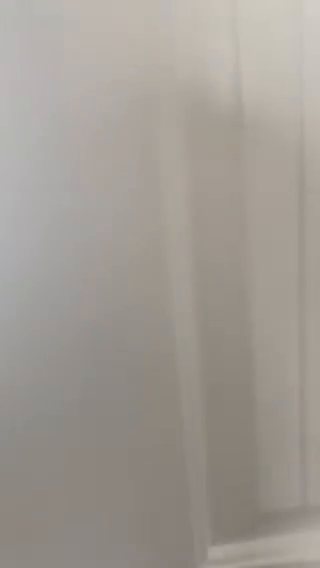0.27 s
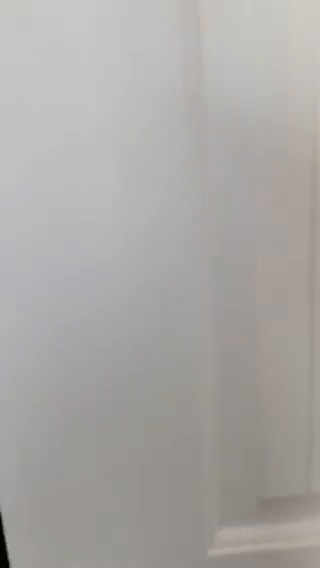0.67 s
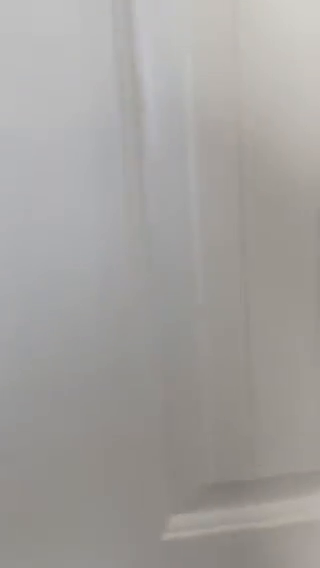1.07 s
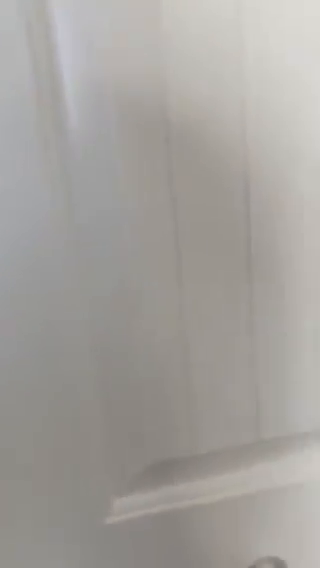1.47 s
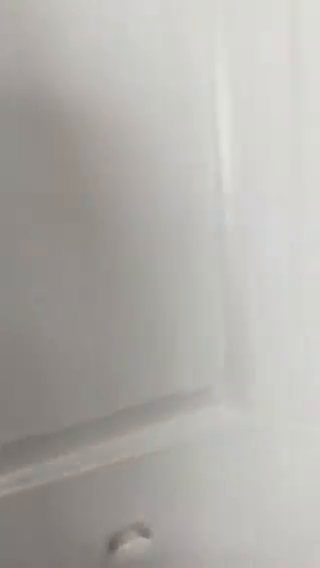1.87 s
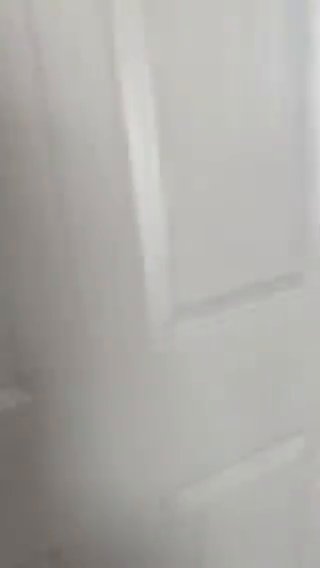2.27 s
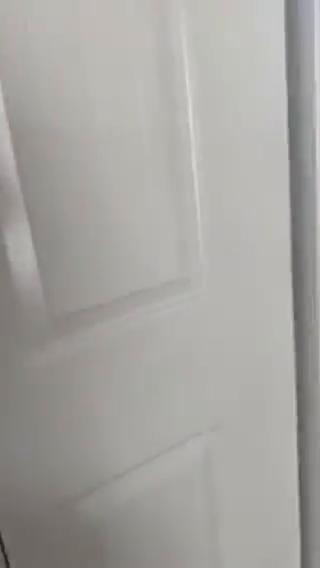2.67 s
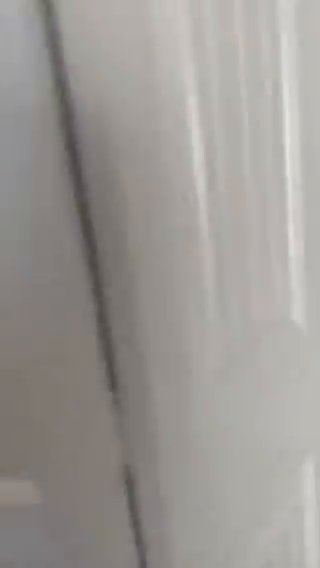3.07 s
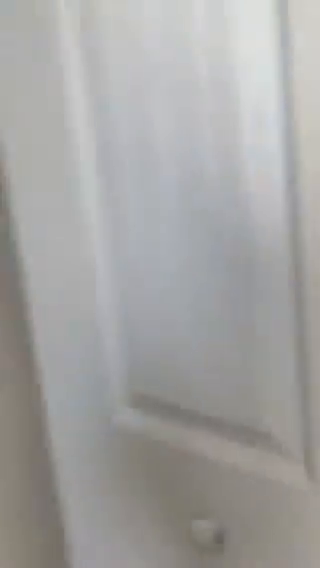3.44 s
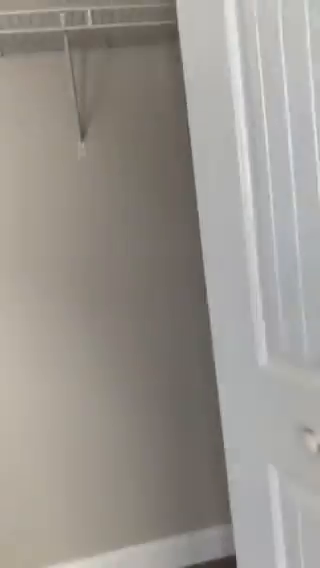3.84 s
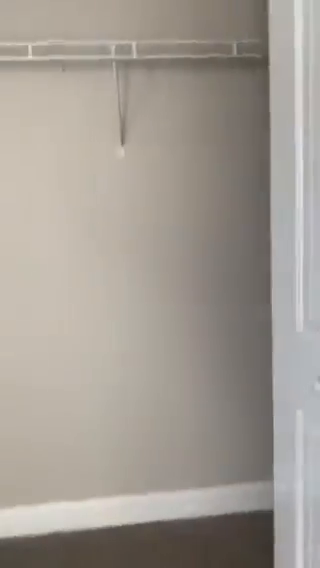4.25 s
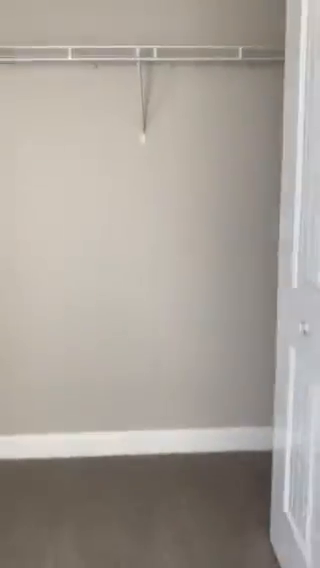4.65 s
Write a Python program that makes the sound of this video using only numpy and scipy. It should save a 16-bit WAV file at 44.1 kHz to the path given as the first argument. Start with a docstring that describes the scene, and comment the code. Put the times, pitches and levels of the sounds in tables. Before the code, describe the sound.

A hollow folding closet door pops free with a sharp knock, then booms, scuffs, creaks and scrapes along its track before clattering folded in a bare room.

```python
"""Faint scuffing and a light tick come first; then a hollow folding closet door breaks free with a sharp knock.
Its panels boom, its hinges tick and scuff, and its guide pin scrapes and catches along the track,
before the leaves fold together with a clatter in a bare room, close to a hand-held phone.
Blows and shoves excite decaying modes; friction is made of random slips, filtered by what they shake.
Each source sends sound straight to two microphone ports and into a diffuse room."""
import sys
import numpy as np
from scipy import signal
from scipy.fft import rfft, irfft, next_fast_len
from scipy.io import wavfile
from scipy.ndimage import uniform_filter1d

SR = 44100
rng = np.random.default_rng(int(sys.argv[2]) if len(sys.argv) > 2 else 0)


def dump_mix(stems):
    """Bounce the given channels to the path in sys.argv[1] as a 16-bit WAV at rate SR."""
    frames = np.atleast_2d(stems).T  # one column per channel
    limited = np.clip(frames, -1, 1)  # hard clip at full scale
    pcm = np.round(limited * 32767).astype(np.int16)
    wavfile.write(sys.argv[1], SR, pcm)


N = 212253
T = np.arange(N) / SR
SIZE = next_fast_len(N + SR)  # padded so that a one-second response cannot wrap around
FREQ = np.arange(SIZE // 2 + 1) * SR / SIZE + 1e-6  # bins [Hz], offset to keep logarithms finite


def undb(db):
    """Level law: decibels to amplitude gain."""
    return 10 ** (np.asarray(db) / 20)


def unit(x):
    """Normalisation: scale to rms 1."""
    return x / np.sqrt(np.mean(x ** 2))


def at(points, hz):
    """Logarithmic pitch axis: interpolate (frequency, value) points along it."""
    f, value = np.transpose(points)
    return np.interp(np.log(hz), np.log(f), value)


def shape(x, response):
    """Linear filtering: multiply the spectrum by a frequency response."""
    return irfft(rfft(x, SIZE) * response, SIZE)[..., :N]


def edge(x, hz, kind, order=2):
    """Causal filtering: a Butterworth low-, high- or band-pass."""
    safe_hz = np.minimum(hz, SR * .48)
    return signal.sosfilt(signal.butter(order, safe_hz, kind, fs=SR, output="sos"), x)


def add(track, s, sound):
    """Superposition: mix a sound in from time s."""
    i = max(int(s * SR), 0)
    track[..., i:i + sound.shape[-1]] += sound[..., :N - i]


def with_send(sound, room_db):
    """Direct and reverberant fields: one row for the phone, one row sent into the room."""
    return np.array([sound, sound * undb(room_db)])


def ring(modes):
    """Modal synthesis: exponentially decaying sines, each up to one second long."""
    out = np.zeros(SR)
    for hz, db, t60 in modes:
        t = T[:min(int(2 * t60 * SR), SR)]
        decay = np.exp(-np.log(1000) * t / t60)
        out[:len(t)] += undb(db) * np.sin(2 * np.pi * hz * t) * decay
    return out


def slips(rate, scatter_db):
    """Stick-slip friction: tiny slips at random moments, rate per second, of very unequal size."""
    moments = rng.random(N) < rate / SR
    return moments * rng.standard_normal(N) * undb(scatter_db * rng.standard_normal(N))


def walk(rate):
    """Slow random modulation: values held for 1 / rate s, slewed, and scaled to rms 1."""
    hold = int(SR / rate)
    steps = np.repeat(rng.standard_normal(N // hold + 1), hold)[:N]
    return unit(uniform_filter1d(steps, hold))


# Background noise spectrum as (frequency [Hz], relative level [dB]).
HOUSE_SPECTRUM = [(20, -6), (50, 1), (110, -2), (300, -9), (600, -29), (1200, -36.5), (2500, -34),
                  (6500, -40.5), (10000, -42.5), (16000, -50.5)]


def house_noise():
    """Stationary filtered noise: the faint steady sound of the house."""
    return undb(-55.5) * unit(shape(rng.standard_normal(N), undb(at(HOUSE_SPECTRUM, FREQ))))


# Reverberation time of the room as (frequency [Hz], t60 [s]).
ROOM_DECAY = [(100, 0.69), (400, 0.59), (1200, 0.68), (3500, 0.53), (7000, 0.45), (14000, 0.1)]
# Spectrum of the reverberant sound as (frequency [Hz], gain [dB]).
ROOM_SPECTRUM = [(30, -18.5), (100, 0.5), (200, -3.5), (400, 1.5), (800, 0), (1500, -1.5), (3000, -5),
                 (7000, -9), (10000, -9), (16000, 1)]


def room(x, build_s=0.0025):
    """Diffuse reverberation: echoes build up within a few ms, then decay at a rate set by frequency."""
    t, tail = T[:SR], 0
    edges = np.geomspace(40, 18000, 12)
    spectrum, hz = rfft(rng.standard_normal(SR)), np.arange(SR // 2 + 1)
    build_up = 1 - np.exp(-(t / build_s) ** 2)
    for lo, hi in zip(edges, edges[1:]):
        band = irfft(spectrum * (hz >= lo) * (hz < hi), SR)
        fade = np.exp(-np.log(1000) * t / at(ROOM_DECAY, np.sqrt(lo * hi))) * build_up
        tail = tail + band * fade / np.sqrt(np.sum(fade ** 2))
    return shape(x, rfft(tail, SIZE) * undb(at(ROOM_SPECTRUM, FREQ)))


# Likeness of the two microphone ports as
# (frequency [Hz], lead of the left port [rad], coherence of the room sound [0-1]).
PORT_LIKENESS = [(0, 0, 1), (350, -0.3, 0.86), (700, -0.65, 0.2), (1400, 0.1, 0.35), (2700, 1.7, 0.44),
                 (3800, 1.5, 0.69), (4900, 3.2, 0.9), (6400, 5.8, 0.85), (7500, 6.5, 0.9), (8350, 9.1, 0.7),
                 (9600, 9.6, 0.7), (10500, 12.6, 0.85), (11600, 12.5, 0.62), (12600, 15.7, 0.6),
                 (13600, 15.7, 0.8), (14500, 18.7, 0.8)]


def ports(near, echo, other_echo):
    """Interaural-style coherence: near sound differs only in phase, while echoes are partly unrelated."""
    hz, lead, coherence = np.transpose(PORT_LIKENESS)
    turn = np.exp(.5j * np.interp(FREQ, hz, lead))  # each port takes half the lead
    alike = np.sqrt(np.interp(FREQ, hz, coherence))
    mid = near + shape(echo, np.sqrt((1 + alike) / 2))
    side = shape(other_echo, np.sqrt((1 - alike) / 2))
    return np.array([shape(mid + side, turn), shape(mid - side, 1 / turn)])


BUILD_DB = 8  # a push starts this far down and gains it as the door gathers speed
RELEASE_S = 0.019  # linear set-in time, and time constant of the ending


def effort(start_s, rise_s, stop_s, sag_db_per_s):
    """Friction follows motion: the gain of a push as the door gathers speed, slows steadily and stops."""
    age = T - start_s
    build_db = -BUILD_DB * np.clip(1 - age / rise_s, 0, 1) ** 2
    sag_db = -sag_db_per_s * np.maximum(age - rise_s, 0)
    stopping = np.exp(-np.maximum(T - stop_s, 0) / RELEASE_S)
    return undb(build_db + sag_db) * np.clip(age / RELEASE_S, 0, 1) * stopping


def shifting(x, colour, depth_db, rate):
    """Moving contact point: each narrow band of the coloured sound swells and fades on its own."""
    spectrum, out = rfft(x, SIZE) * undb(at(colour, FREQ)), 0
    edges = np.geomspace(20, 20000, 26)
    for lo, hi in zip(edges, edges[1:]):
        band = irfft(spectrum * (FREQ >= lo) * (FREQ < hi), SIZE)[:N]
        out = out + band * undb(depth_db * walk(rate))
    return unit(out)


# Response of the shaken hollow leaf as (frequency [Hz], relative level [dB]).
LEAF_RUMBLE = [(25, -5.5), (50, 5.5), (75, -19.5), (102, 10), (135, -1.5), (180, -0.5), (235, -4.5),
               (290, -7.5), (400, -5.5), (500, -14), (680, -34), (1500, -76.5)]
SCRAPE_LATE_S = 0.19  # added to the rise: the edge bears down fully only once the leaf is under way


def rubbing(push, colour, jiggle_db=-12):
    """Friction excitation: slips shake the leaf and scrape its edge in spurts; loose pivots tap the skin."""
    start_s, rise_s, stop_s, sag, rumble_db, scrape_db = push
    shake = undb(rumble_db + 1.9 * walk(rate=16)) * effort(start_s, rise_s, stop_s, sag)
    scrape = undb(scrape_db) * effort(start_s, rise_s + SCRAPE_LATE_S, stop_s, sag)
    body = unit(shape(slips(rate=900, scatter_db=3.0), undb(at(LEAF_RUMBLE, FREQ))))
    taps = unit(shape(slips(rate=130, scatter_db=1), rfft(ring(SKIN_MODES), SIZE)))
    spurts = slips(rate=1500, scatter_db=1.8) * undb(3.2 * walk(rate=28))
    grit = shifting(spurts, colour, depth_db=3.5, rate=14)
    rumble = with_send(shake * body, room_db=-3.5)
    tapping = with_send(undb(jiggle_db) * shake * taps, room_db=1.5)
    return rumble + tapping + with_send(scrape * grit, room_db=3)


# The hand takes hold, swings the leaves out, slides them aside, then presses them together, as
# (start [s], rise [s], stop [s], sag [dB/s], rumble level [dB], scrape level [dB]).
HAND_PUSHES = [(0.0, 0.0067, 0.14, 9, -63, -59), (0.84, 0.24, 3.3, 12.5, -44.5, -58.5),
               (2.957, 0.53, 4.42, 8, -45, -53), (4.487, 0.2, 4.7, 19, -43.5, -70)]
# Edge friction spectra, scuffing and scraping, as (frequency [Hz], relative level [dB]).
SCUFF_SPECTRUM = [(200, -24), (450, 3), (800, -7), (1200, -7), (1800, -9), (2600, -21), (4000, -19),
                  (5000, -14.5), (6500, -22), (9000, -38), (15000, -38.5)]
SCRAPE_SPECTRUM = [(200, 1), (400, 2.5), (620, 1), (900, 0.5), (1080, 4), (1400, -4), (2000, -6),
                   (2800, -6.5), (4500, -8.5), (6800, -15.5), (9000, -35), (15000, -36)]


def friction():
    """Sliding friction: sum the four pushes; only the slide aside has the scraping spectrum."""
    colours = (SCUFF_SPECTRUM, SCUFF_SPECTRUM, SCRAPE_SPECTRUM, SCUFF_SPECTRUM)
    return sum(rubbing(push, colour) for push, colour in zip(HAND_PUSHES, colours))


# Resonances of the metal track as (frequency [Hz], width [Hz], level [dB]).
TRACK_RESONANCES = [(1126, 54, 7), (1880, 150, 6), (2290, 200, 6), (2980, 510, -3), (3820, 720, 6)]
# The pin bears on the track once the leaves have begun to fold, as
# (start [s], rise [s], stop [s], sag [dB/s]).
PIN_TRAVEL = (3.41, 0.39, 4.31, 7.8)


def guide_pin(run_db=-57, soft_hz=7500):
    """Source-filter principle: the plastic pin's uneven judder excites the resonances of the metal track."""
    track = 0
    for hz, width, db in TRACK_RESONANCES:
        track = track + undb(db) / (1 + 1j * (FREQ / hz - hz / FREQ) * hz / width)
    track = track / np.sqrt(np.mean(abs(track) ** 2))
    force = undb(run_db) * effort(*PIN_TRAVEL)
    spurts = unit(slips(rate=1400, scatter_db=2) * undb(3.5 * walk(rate=30)))
    grain = edge(spurts, soft_hz, "low")
    return with_send(shape(force * grain, track), room_db=1.0)


# The leaf edge drags and groans, as (time [s], level [dB], resonance [Hz], length [s]).
EDGE_DRAGS = [(0.941, -50, 408, 0.035), (1.066, -48, 458, 0.078), (1.281, -48, 473, 0.047),
              (3.237, -47.5, 423, 0.13), (3.321, -47, 436, 0.061), (3.396, -47, 423, 0.049),
              (3.463, -44.5, 406, 0.076), (3.563, -51, 364, 0.1), (3.602, -50, 830, 0.055),
              (3.741, -50, 720, 0.053)]


def groans(spread=0.074, upper_ratio=2.745, upper_db=-11):
    """Friction-driven resonance: a run of slips rings one narrow leaf resonance and a weaker one above."""
    out = np.zeros((2, N))
    for s, db, hz, length_s in EDGE_DRAGS:
        t = T[:int(length_s * SR)]
        force = slips(rate=1200, scatter_db=1)[:len(t)]
        band = hz * np.array([1 - spread, 1 + spread])
        upper = undb(upper_db) * unit(edge(force, band * upper_ratio, "band"))
        tone = unit(edge(force, band, "band")) + upper
        swell = np.sqrt(np.sin(np.pi * t / length_s))
        add(out, s, with_send(undb(db) * tone * swell, room_db=-4.0))
    return out


# The guide pin catches and slips, as (time [s], level [dB], local ring of the track [Hz]).
PIN_CATCHES = [(3.605, -46, 3600), (3.741, -40, 3440), (3.885, -42, 3800), (4.071, -42, 3770),
               (4.291, -54.5, 3600)]


def catches(spread=0.1, broad_db=-5, low_hz=900, high_hz=5500, decay_s=0.0098):
    """Impulsive release: a broad crunch and a brief ring whose pitch depends on the place along the track."""
    out, t = np.zeros((2, N)), T[:SR // 8]
    for s, db, hz in PIN_CATCHES:
        force = slips(rate=2200, scatter_db=2.5)[:len(t)]
        chink = unit(edge(force, hz * np.array([1 - spread, 1 + spread]), "band"))
        crunch = undb(broad_db) * unit(edge(force, [low_hz, high_hz], "band"))
        add(out, s, with_send(undb(db) * (chink + crunch) * np.exp(-t / decay_s), room_db=-1))
    return out


# Loose pivots rattle on after a heavy blow, as (time [s], level [dB], decay time constant [s]).
PIVOT_RATTLES = [(0.45, -42, 0.086), (2.48, -48, 0.044)]


def rattles(low_hz=2200, high_hz=6500):
    """Repeated micro-impacts: loose pivots buzz in their sockets as a crackle that dies away."""
    out, t = np.zeros((2, N)), T[:SR // 2]
    for s, db, decay_s in PIVOT_RATTLES:
        clicks = slips(rate=260, scatter_db=2)[:len(t)]
        crackle = unit(edge(clicks, [low_hz, high_hz], "band", order=3))
        add(out, s, with_send(undb(db) * crackle * np.exp(-t / decay_s), room_db=3))
    return out


# Hardware ticks and short scuffs as
# (time [s], level [dB], brightest frequency [Hz], decay time constant [s], room send [dB]).
HARDWARE_TICKS = [(0.004, -53.5, 2860, 0.02, 6), (0.125, -38, 1970, 0.0013, -11),
                  (0.337, -50.5, 3300, 0.004, 11), (0.359, -54.5, 4900, 0.0035, 23.5),
                  (0.376, -55, 10000, 0.0027, 6), (0.427, -34.5, 1550, 0.017, -11),
                  (0.4365, -19.5, 2270, 0.0064, -4), (0.4375, -22, 6100, 0.0022, 4.5),
                  (0.592, -33.5, 2000, 0.002, -1), (0.596, -49.5, 10000, 0.0044, 4),
                  (0.6284, -32.5, 5100, 0.0015, 6.5), (0.8057, -43.5, 1890, 0.005, 5.5),
                  (0.931, -50.5, 5100, 0.0021, 8), (1.092, -54, 5500, 0.0097, 13.5),
                  (1.311, -47.5, 7060, 0.0015, 14), (1.44, -53.5, 1270, 0.046, 5),
                  (1.463, -56.5, 8700, 0.011, 15), (1.609, -64, 5670, 0.093, 7.5),
                  (1.726, -54.5, 5200, 0.0049, 14.5), (1.884, -65, 2620, 0.011, -7),
                  (2.026, -60, 2150, 0.026, 6), (2.13, -62.5, 1990, 0.012, 10),
                  (2.154, -56.5, 4200, 0.0069, 12), (2.2215, -35, 2900, 0.0025, 5.5),
                  (2.222, -37.5, 11300, 0.0006, 3), (2.365, -45.5, 7860, 0.0029, 6),
                  (2.4653, -35.5, 1730, 0.01, 3.5), (2.468, -41.5, 9400, 0.0043, 13.5),
                  (2.4693, -29.5, 3220, 0.0026, 10.5), (3.037, -54.5, 5340, 0.0011, 23),
                  (3.143, -40.5, 3880, 0.0024, 14), (3.892, -42, 2850, 0.002, 16),
                  (4.067, -39, 2900, 0.0018, 4.5), (4.402, -44.5, 9100, 0.0035, 9),
                  (4.604, -35.5, 4060, 0.0048, 8.5), (4.629, -31.5, 7300, 0.0045, 5.5),
                  (4.694, -40.5, 5950, 0.011, 3.5)]


def ticks():
    """Short-transient noise: each hardware tick or short scuff is a decaying burst of broad crackle."""
    out, t = np.zeros((2, N)), T[:SR // 8]
    for s, db, hz, decay_s, room_db in HARDWARE_TICKS:
        crackle = edge(rng.standard_normal(len(t)), hz / 2.6, "high", order=1)
        burst = unit(edge(crackle, hz * 1.3, "low", order=3))
        add(out, s, with_send(undb(db) * burst * np.exp(-t / decay_s), room_db))
    return out


# Soft shoves that flex the leaves, as (time [s], drive level [dB], most strongly driven frequency [Hz]).
LEAF_SHOVES = [(0.445, -22.5, 50.6), (0.488, -27.5, 70), (0.612, -23.5, 169), (0.65, -26, 163),
               (0.662, -28.5, 60.7), (0.808, -41, 130), (1.005, -43.5, 79), (1.094, -44, 113),
               (1.228, -35, 153), (1.309, -49, 109), (2.166, -38, 405), (2.17, -36.5, 75.6),
               (2.198, -31.5, 136), (2.209, -36, 54.3), (2.263, -40.5, 70), (2.373, -37, 285),
               (2.474, -32, 300), (2.482, -36.5, 74), (2.515, -34.5, 190), (2.537, -38.5, 55),
               (2.61, -36.5, 131), (3.148, -38.5, 116), (4.33, -42, 120), (4.491, -42, 340),
               (4.542, -40, 125), (4.616, -34.5, 206.5), (4.647, -29, 177), (4.691, -37.5, 71.5),
               (4.728, -37.5, 103), (4.763, -33.5, 88)]
# Flexing modes of whole leaves as (frequency [Hz], level [dB], t60 [s]).
FLEX_MODES = [(51.9, 3, 1), (77.8, 5, 0.24), (107.3, 1.5, 0.37), (167.2, 1, 0.21), (210, 0.5, 0.22),
              (238.5, -2, 0.23), (302.6, -2, 0.21), (385.5, 0.5, 0.098), (472, -1.5, 0.13)]
# Moments at which the hand tightens and stills the swaying leaves, as (time [s]).
HAND_GRIPS = [0.85, 1.34, 4.1]
GRIP_S = 0.011  # time constant with which a grip stills the sway


def thuds(octaves=0.79, push_s=0.0024, stiffen=0.201, settle_s=0.031):
    """Selective modal excitation: a slow shove wakes modes near its own pace, sharp under load, then sagging."""
    out, t = np.zeros((2, N)), T[:SR]
    hz, mode_db, t60 = np.transpose(FLEX_MODES)
    # time runs fast at first, by the fraction stiffen, so the pitch sags to rest
    sagging = t + stiffen * settle_s * (1 - np.exp(-t / settle_s))
    for s, db, push_hz in LEAF_SHOVES:
        # each shove detunes all but the lowest mode slightly at random
        detune = 1 + .035 * rng.standard_normal(len(hz)) * (hz > hz[0])
        drive_db = mode_db - 10 * (np.log2(hz / push_hz) / octaves) ** 2
        modes = ring(zip(hz * detune, drive_db, t60))
        boom = np.interp(sagging, t, modes) * (1 - np.exp(-t / push_s))
        free_s = min([grip for grip in HAND_GRIPS if grip > s], default=T[-1]) - s
        boom = boom * np.exp(-np.maximum(t - free_s, 0) / GRIP_S)
        add(out, s, with_send(undb(db) * boom, room_db=-3.0))
    return out


def chatter(db, loose_db=-14, rattle_s=0.0057):
    """Contact mechanics: the force of a hard blow seats at once, that of a light one rattles for some ms."""
    t = T[:SR]
    rattle = slips(rate=4700, scatter_db=-2.0)[:SR] * t * np.exp(-t / rattle_s)
    bounces = edge(rattle, hz=510, kind="high")
    rattle_db = min(loose_db - 0.34 * db, 3)
    force = signal.unit_impulse(SR) + undb(rattle_db) * bounces / np.linalg.norm(bounces)
    return force / np.linalg.norm(force)


# Blows on a leaf, from light taps to the hard slam, as
# (time [s], level before a common trim [dB], contact cut-off [Hz], low cut [Hz], room send [dB]).
LEAF_BLOWS = [(0.1208, -28, 2600, 300, -6), (0.366, -28.5, 3520, 500, 4), (0.4345, 3.5, 3200, 190, -7),
              (0.474, -14.5, 1900, 500, 1), (0.518, -13.5, 800, 300, -4), (0.548, -15, 1080, 500, -4),
              (0.589, -12, 1690, 814, 0.5), (0.608, -16.5, 1010, 690, 2.5), (0.625, -18.5, 2400, 500, -4.5),
              (0.749, -28.5, 905, 298, 5), (1.088, -32, 900, 300, 4), (1.28, -31, 1110, 301, 11),
              (1.461, -27.5, 2300, 710, 6.5), (1.5, -31.5, 900, 298, 6.5), (1.719, -31.5, 2300, 1190, 3.5),
              (2.137, -31.5, 686, 294, 2), (2.159, -22.5, 560, 248, 6), (2.22, -24.5, 3020, 1440, -13),
              (2.362, -27.5, 2000, 410, 5.5), (2.4665, -11.5, 1804, 280, -3), (2.478, -20, 1500, 700, -2.5),
              (2.952, -31, 1120, 600, 4), (3.056, -31, 1800, 500, -8), (3.142, -29, 3060, 405, 3.5),
              (3.276, -26, 1600, 500, 3.5), (3.438, -39, 1500, 506, -1), (3.484, -28.5, 1710, 500, -8),
              (3.603, -28.5, 1630, 600, 6.5), (3.642, -27.5, 1800, 600, -3), (3.739, -30, 2000, 604, 6),
              (3.778, -29.5, 1820, 700, 2.5), (3.882, -28.5, 2510, 604, 1), (4.069, -30.5, 1780, 605, 4),
              (4.607, -18.5, 2200, 1100, 1)]
# Modes of the door skin as (frequency [Hz], level [dB], t60 [s]).
SKIN_MODES = [(195, -15.5, 0.073), (317, -8.5, 0.048), (420, -10, 0.016), (650, -11.5, 0.026),
              (906, -10, 0.026), (1080, -19.5, 0.029), (1225, -21, 0.022), (1720, -12.5, 0.0095),
              (2026, -20.5, 0.012), (2280, -13, 0.0047), (2760, -19.5, 0.012), (3090, -19, 0.012),
              (4130, -16.5, 0.0085)]
# Modes of the hollow core, which sings on after a heavy blow, as (frequency [Hz], level [dB], t60 [s]).
CORE_MODES = [(162.2, -21.5, 0.3), (198.5, -22.5, 0.15), (300.6, -15, 0.23), (574, -39.5, 0.38),
              (654, -30.5, 0.15), (764, -32.5, 0.5), (884, -24.5, 0.16), (1003, -31, 0.15),
              (1425, -39.5, 0.36)]


def knocks(travel_s=.0065, edge_db=-12, core_growth=0.51, stray_per_db=0.04, count=6):
    """Dispersion of bending waves: treble crosses the skin first; edges return a wooden cluster of echoes."""
    hz_bins = np.arange(SR // 2 + 1)
    hz, mode_db, t60 = np.transpose(SKIN_MODES)
    lag = 4 * np.pi * travel_s * np.sqrt(1000 * hz_bins)  # phase [rad]; travel_s holds at 1 kHz
    crossing = np.exp(-1j * lag)
    out, core = np.zeros((2, N)), ring(CORE_MODES)
    for s, db, contact_hz, low_hz, room_db in LEAF_BLOWS:
        paths = rng.uniform(1.2, 2.9, count)  # echo path lengths relative to the direct one
        sizes = rng.choice([-1, 1], count) / np.sqrt(count)
        # light blows land all over the leaf, each with its own tuning; heavy ones wake the core
        detune = np.exp(stray_per_db * min(db, 0) * rng.standard_normal(len(hz)))
        skin_ring = ring(zip(hz * detune, mode_db, t60))
        skin = rfft(skin_ring + undb(core_growth * db) * core)
        # only short waves fit between the edges as separate echoes
        short_waves = hz_bins / (hz_bins + 600)
        echoes = undb(edge_db) * (sizes @ np.exp(-1j * np.outer(paths, lag))) * short_waves
        near = rfft(chatter(db)) * skin * (crossing + echoes)
        # the room hears all parts of the leaf at once, so single modes blur into a broad clack
        power = uniform_filter1d(abs(skin) ** 2, size=300)
        blurred = np.sqrt(uniform_filter1d(power, size=300))
        bass_cut = hz_bins ** 2 / (hz_bins ** 2 + 120 ** 2)
        far = undb(room_db) * blurred * crossing * bass_cut
        waves = irfft(np.array([near, far]), SR)[:, :SR // 2]
        softened = edge(waves, contact_hz, "low")
        add(out, s, undb(db - 1.5) * edge(softened, low_hz, "high", order=1))
    return out


def scene(drift_hz=2.5):
    """Superposition of direct and reverberant fields: door, room and faint house noise at the phone."""
    sliding = friction() + guide_pin() + groans()
    hardware = catches() + rattles() + ticks()
    direct, send = sliding + hardware + thuds() + knocks()
    # two random echo patterns trade places slowly, so tails do not ring on fixed pitches
    echoes = (room(send) + 1j * room(send)) * np.exp(2j * np.pi * drift_hz * T)
    return ports(direct + house_noise(), echoes.real, echoes.imag)


TOP_HZ = 16000  # upper limit of the phone


def record(dry):
    """Band limiting: the phone cuts the top with a steep elliptic low-pass."""
    return signal.sosfilt(signal.ellip(8, .2, 70, TOP_HZ, fs=SR, output="sos"), dry)


dry = scene()
out = record(dry)
dump_mix(out)
```